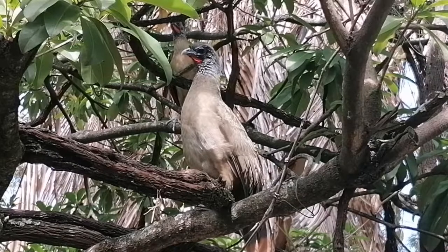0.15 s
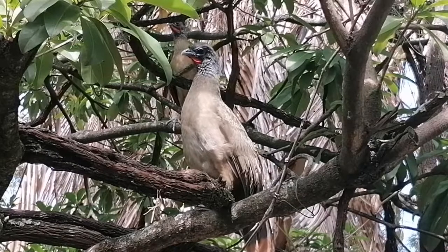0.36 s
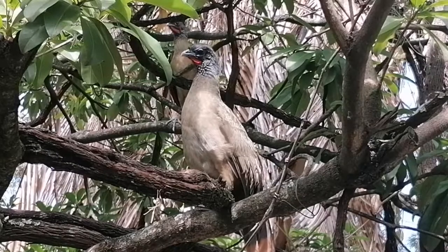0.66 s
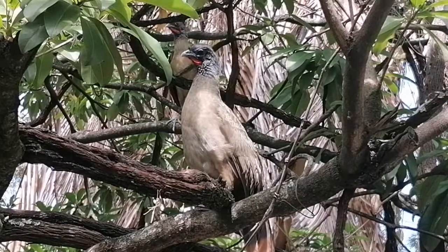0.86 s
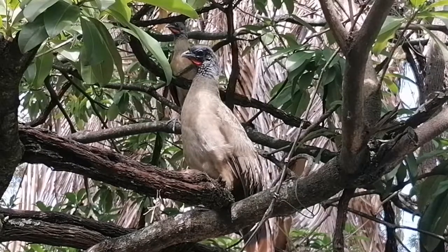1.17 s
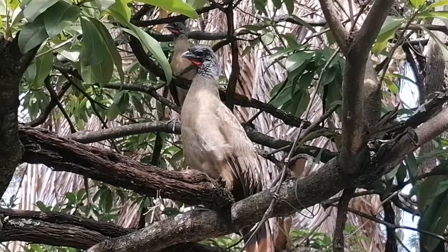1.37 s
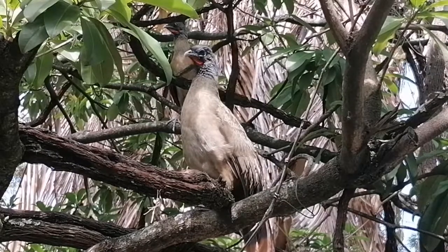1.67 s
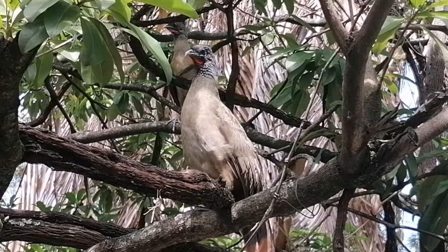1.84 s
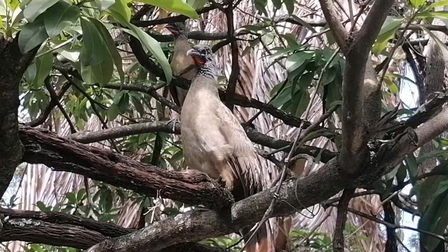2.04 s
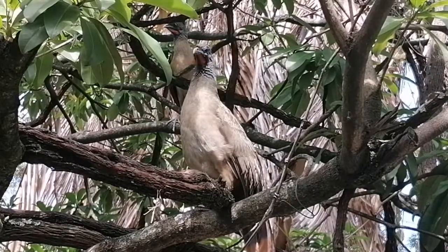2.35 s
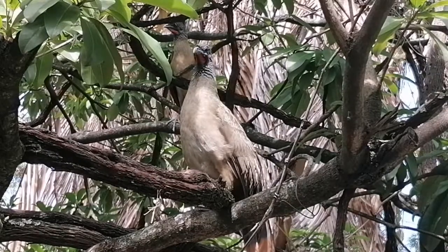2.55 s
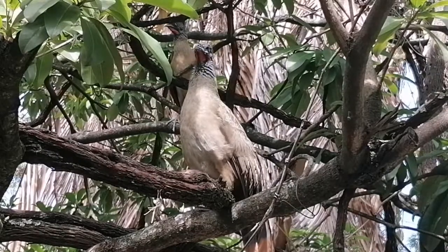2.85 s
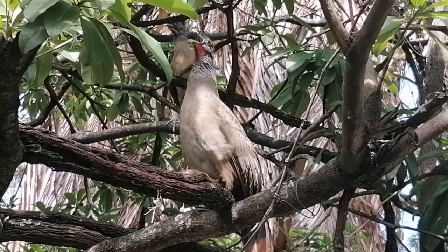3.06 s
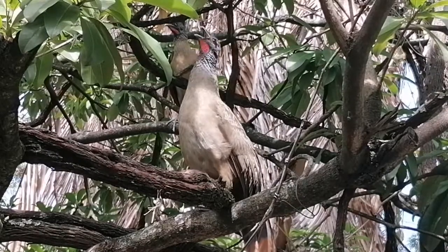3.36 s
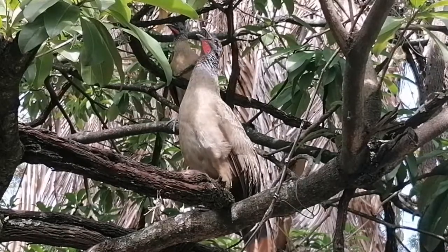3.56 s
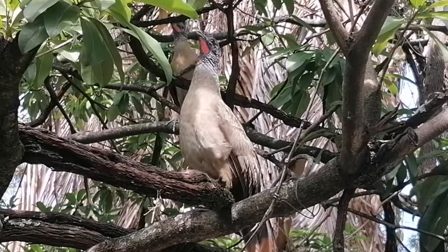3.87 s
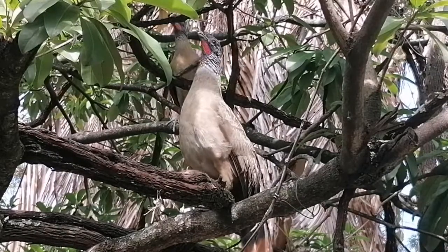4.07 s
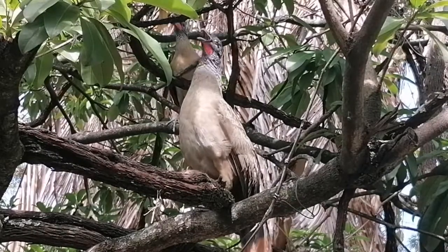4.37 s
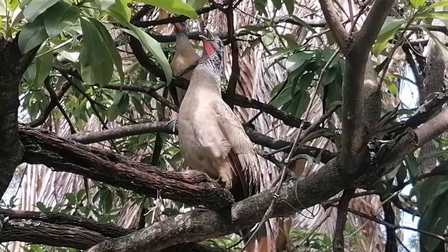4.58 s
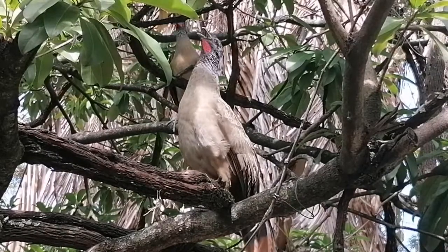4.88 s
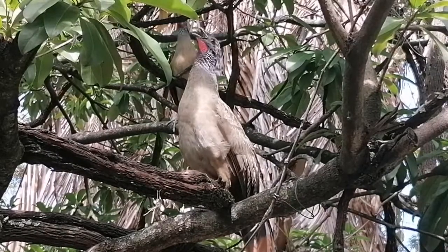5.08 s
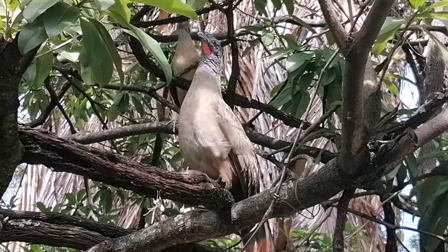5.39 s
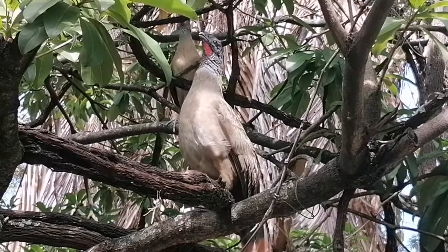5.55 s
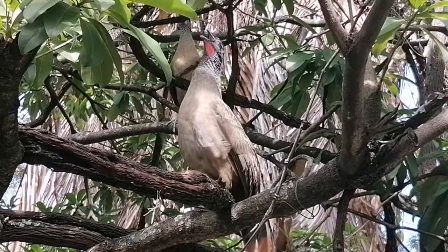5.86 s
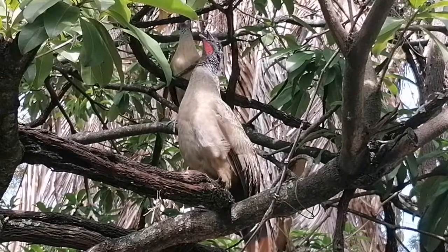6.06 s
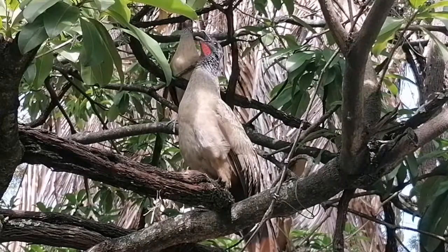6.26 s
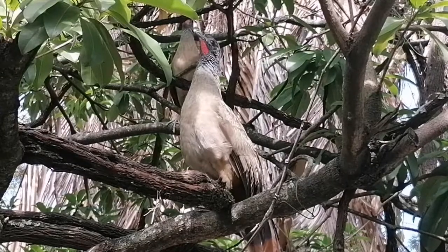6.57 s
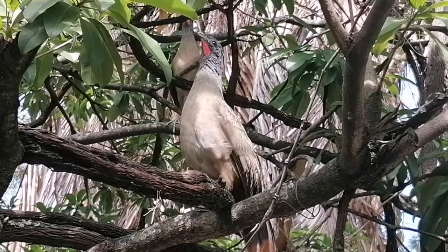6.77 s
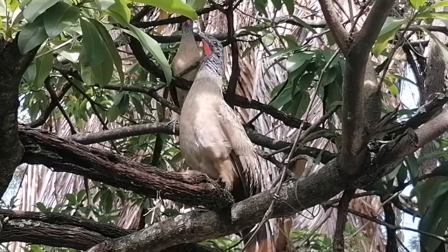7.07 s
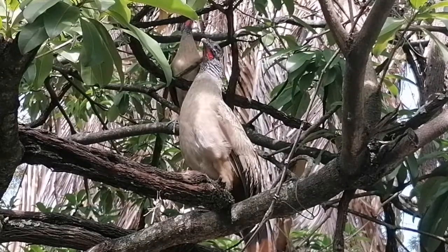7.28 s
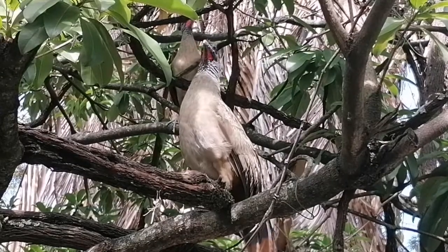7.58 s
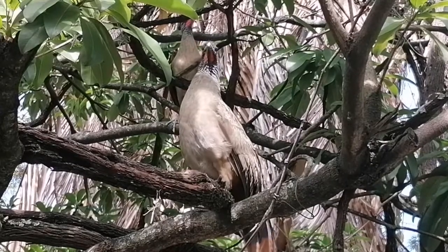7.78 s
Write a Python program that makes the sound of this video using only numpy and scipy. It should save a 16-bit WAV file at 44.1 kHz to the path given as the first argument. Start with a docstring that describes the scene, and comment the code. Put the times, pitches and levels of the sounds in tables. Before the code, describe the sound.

Outdoors in a leafy grove, hoarse chicken-like tree birds call in turns: one at left starts with two throaty honks, then chattering phrases; another ahead replies with repeated harsh cackles, and a high, squealing yelper joins near the end. A thin distant whistle precedes them. Reverberant scatter follows every cry. Soft air hiss, faint small birds and low wind bumps on the handheld microphone lie underneath.

```python
"""Three chachalacas call in overlapping turns from a leafy tree: one to the left, one ahead, a shriller one beside it.
Faint whistles, small birds and a low hum sound far away over a quiet hiss and a little wind on the microphone.
The raucous birds add puffs from two sides of the syrinx, each at its own rate, and ring them in the windpipe.
The shrill bird sums gliding partials with pulsed rasp; far birds are sines or narrow noise bands.
Decaying noise echoes stand for scatter off twigs, trunks and leaves; air and wind are shaped stereo noise."""
import sys
import numpy as np
from scipy import signal
from scipy.fft import rfft, irfft
from scipy.io import wavfile
from scipy.ndimage import uniform_filter1d

SR = 44100
rng = np.random.default_rng(int(sys.argv[2]) if len(sys.argv) > 2 else 0)


def to_wav(sig):
    """Store sig (one row per channel, or 1-D mono) as 16-bit WAV at the path in sys.argv[1].

    Samples outside -1..1 are clipped; the rate is SR.
    """
    pcm = np.clip(np.atleast_2d(sig), -1, 1) * 32767
    pcm = np.round(pcm).astype(np.int16)
    wavfile.write(sys.argv[1], SR, pcm.T)  # frames by channels


N = 349695
TIME_S = np.arange(N) / SR


def amp(db):
    """Turn decibels into a linear gain."""
    return 10 ** (np.asarray(db) / 20)


def rms_one(x):
    """Scale to unit rms."""
    return x / np.sqrt(np.mean(x ** 2) + 1e-20)


def evened(x):
    """Hold the short-term rms near 1, over windows of about 30 ms."""
    return x / np.sqrt(uniform_filter1d(x ** 2, size=1300) + 1e-12)


def band(x, low_hz, high_hz):
    """Keep one range of frequencies with a Butterworth band-pass."""
    edges_hz = [low_hz, min(high_hz, SR * .45)]
    return signal.sosfilt(signal.butter(2, edges_hz, "band", fs=SR, output="sos"), x)


def drift(rate_hz):
    """Random wandering of unit rms: noise through a two-pole low-pass at about the given rate."""
    r = np.exp(-2 * np.pi * rate_hz / SR)
    settle = 9000  # samples dropped while the filter starts up
    wander = signal.lfilter([1], [1, -2 * r, r * r], rng.standard_normal(N + settle))
    return rms_one(wander[settle:])


def stereo_noise(alike):
    """White noise partly shared by both ears: alike runs from 0 (separate) to 1 (the same)."""
    mid, side = rng.standard_normal((2, N))
    return np.sqrt(1 + alike) * mid + np.sqrt(1 - alike) * side * [[1], [-1]]


def in_time(rows):
    """Draw straight lines through a table whose first column is time, one curve per other column."""
    s, *columns = np.transpose(rows)
    return [np.interp(TIME_S, s, column) for column in columns]


def gated_curves(tables):
    """A gate open within each table's time span, its edges smoothed over 4 ms, and the joined curves."""
    is_open = sum((TIME_S > rows[0][0]) & (TIME_S < rows[-1][0]) for rows in tables)
    gate = uniform_filter1d(np.minimum(is_open, 1.), size=180)
    return gate, in_time([row for rows in tables for row in rows])


def sung(table):
    """For each note: its samples, time since its start, share of its length, gain and other columns."""
    release_s, release_db = .022, -21.5
    attack_curve = 0.64  # under 1: a note jumps in, then swells
    for start, attack, length, peak_db, end_db, *rest in table:
        first = int(start * SR)
        count = min(int((length + 2 * release_s) * SR), N - first)
        since = np.arange(count) / SR
        # sag from the peak to the end level, then die away in two steps
        corners_s = [attack, max(length, attack + .001), length + release_s, length + 2 * release_s]
        db = np.interp(since, corners_s, [peak_db, end_db, end_db + release_db, end_db + 3 * release_db])
        rise = np.minimum(since / max(attack, .002), 1) ** attack_curve
        yield slice(first, first + count), since, since / length, amp(db) * rise, rest


def repeated(phrase, starts):
    """Lay out the rows of a phrase at each of its starts, stretched in time."""
    return [(start + stretch * s, *rest) for start, stretch in starts for s, *rest in phrase]


def pipe(x, modes):
    """Windpipe: parallel resonances with alternating signs."""
    out = 0
    for k, (hz, width_hz, db) in enumerate(modes):
        r = np.exp(-np.pi * width_hz / SR)
        feed = [(1 - r * r) / 2, 0, (r * r - 1) / 2]
        ring = [1, -2 * r * np.cos(2 * np.pi * hz / SR), r * r]
        out = out + (-1) ** k * amp(db) * signal.lfilter(feed, ring, x)
    return out


def placed(low, treble, place):
    """Seat a bird in stereo: pan low and treble apart and let sound reach the left ear first."""
    low_db, treble_db, lead_s = place
    side = np.array([[.5], [-.5]])
    left, right = low * amp(low_db * side) + treble * amp(treble_db * side)
    late = np.exp(-2j * np.pi * np.fft.rfftfreq(N, 1 / SR) * lead_s)
    return np.array([left, irfft(rfft(right) * late, N)])


def air():
    """Far hiss of leaves and town: broadband noise with a fixed colour and a slightly drifting level."""
    # spectrum of the hiss: (frequency [Hz], relative level [dB])
    colour = [(88, -37), (150, -27), (258, -5), (326, -10), (561, -11), (860, -13.5), (2760, -18.5),
              (3550, -24), (5870, -24.5), (15500, -42.5)]
    level_db, alike = -69, .5
    hz = np.maximum(np.fft.rfftfreq(N, 1 / SR), 1)
    colour_hz, colour_db = np.transpose(colour)
    shape = amp(np.interp(np.log(hz), np.log(colour_hz), colour_db))
    hiss = rms_one(irfft(rfft(stereo_noise(alike)) * shape, N))
    return amp(level_db + 1.2 * drift(5.6)) * hiss


def wind():
    """Wind on the microphone: lumpy low noise in two bands, bell-shaped gusts over a murmur."""
    # murmur between the gusts: (time [s], thud level [dB], hum level [dB])
    murmur = [(0.0, -65, -69.5), (.7, -71, -75.5), (2.1, -74, -75), (3.2, -86, -75.5), (4.5, -84, -101),
              (5.45, -83, -79), (5.75, -75.5, -66), (6.3, -74, -88.5), (6.8, -76.5, -77), (7.5, -72, -64),
              (7.93, -75, -74.5)]
    # gusts: (centre [s], half width [s], thud level [dB])
    gust_rows = [(1.25, 0.19, -55), (2.66, 0.066, -66), (2.96, .1, -62.5), (3.57, 0.065, -52),
                 (3.84, 0.085, -51), (4.15, .07, -61), (5.63, .1, -72.5), (7.93, 0.22, -67)]
    gust_hum_db = -12.5  # higher part of each gust, against its thud
    thud_db, hum_db = in_time(murmur)
    gusts = sum(amp(db) * np.exp(-((TIME_S - s) / width) ** 2) for s, width, db in gust_rows)
    noise = stereo_noise(alike=.65)
    thud_level = (amp(thud_db) + gusts) * amp(1.7 * drift(8))
    thud = thud_level * rms_one(band(noise, 24, 70))
    hum_level = (amp(hum_db) + amp(gust_hum_db) * gusts) * amp(2.5 * drift(8))
    return thud + hum_level * rms_one(band(noise, 65, 140))


def rising_whistle():
    """A far, almost pure whistle climbing steadily: a sine and its faint octave."""
    # loudness: (time [s], level [dB])
    loudness = [(0.0, -57.5), (.1, -69.5), (.15, -72), (.21, -56), (.29, -54.5), (.335, -61.5),
                (.53, -50.5), (.57, -57.5), (.66, -55), (.7, -75), (.73, -66), (.77, -91.5)]
    start_hz, climb_hz_per_s, octave_db = 688, 187, -20.5
    gate, (db,) = gated_curves([loudness])
    phase = 2 * np.pi * np.cumsum(start_hz + climb_hz_per_s * TIME_S) / SR
    return gate * amp(db) * (np.sin(phase) + amp(octave_db) * np.sin(2 * phase))


def far_sounds():
    """Far whistle, hoot, thin notes, chirps and hum: sines, most of them blurred by random gain."""
    # all four: (start [s], attack [s], length [s], peak [dB], end level [dB], from [Hz], to [Hz])
    # one soft near-sine note before the first cry
    hoot = (.936, .02, .085, -51, -48, 603, 610)
    # thin breathy notes
    thin_notes = [(0, .12, .68, -74, -77, 3530, 3590), (.12, .16, .29, -59, -74, 1400, 1190),
                  (7.08, .025, .13, -71, -77, 3800, 3800), (7.7, .14, .23, -71, -72, 3720, 3500)]
    # breathy chirps of small birds
    chirps = [(0, 0.0065, 0.083, -69.5, -77, 3880, 3600), (.15, .135, 0.26, -68, -85, 3590, 3380),
              (.92, 0.018, .09, -89, -78, 7400, 7140), (1.35, 0.0091, .14, -79, -83, 7070, 7050),
              (5.66, 0.02, .1, -72.5, -70.5, 7618, 7553), (6.88, 0.011, 0.058, -75, -77, 5950, 5820),
              (6.96, 0.028, .13, -70, -77, 5910, 5900), (7.72, 0.077, .1, -63.5, -64, 5560, 5730),
              (7.825, .008, .1, -52, -67, 5500, 5520)]
    # one low hum
    far_hum = (6.83, .04, .72, -64, -65, 101, 104)
    # a faster random gain spreads a sine into a wider band of noise
    layers = [([hoot], np.ones(N)), (thin_notes, drift(50)), (chirps, drift(450)),
              ([far_hum], 1 + 0.49 * drift(4.8))]
    out = rising_whistle()
    for table, blur in layers:
        for span, _, share, gain, (from_hz, to_hz) in sung(table):
            phase = 2 * np.pi * np.cumsum(from_hz + (to_hz - from_hz) * share) / SR
            out[span] += gain * blur[span] * np.sin(phase)
    return out * np.sqrt(2)  # levels count as rms


def grove(x):
    """Scatter from twigs, near trunks and the far edge: noise dying band by band, separate for each ear."""
    # octave bands: (centre [Hz], trunks t60 [s], trunks level [dB], far edge t60 [s], far edge level [dB])
    octaves = [(286, 0.67, -12, .6, -13.5), (595, 0.68, -7.5, 0.6, -32.5), (977, 0.46, -5.5, 1.47, -21.5),
               (2240, 0.41, -3, 1.6, -23.5), (5100, 0.36, -2, 1.2, -19), (9000, 0.42, -4, 0.41, -46)]
    twigs_db, twigs_t60_s = -4, .04
    t = np.arange(int(1.3 * SR)) / SR

    def dying(db, t60_s):
        """Exponential decay by 60 dB in t60, scaled so that long decays start lower."""
        return amp(db - 60 * t / t60_s) / np.sqrt(t60_s * SR / 14)

    white = rng.standard_normal((2, len(t)))
    response = band(rng.standard_normal((2, len(t))), 1100, 17000) * dying(twigs_db, twigs_t60_s)
    build_up = np.minimum(t / 0.012, 1)
    for hz, near_t60, near_db, far_t60, far_db in octaves:
        noise = rms_one(band(white, hz / np.sqrt(2), hz * np.sqrt(2)))
        noise = noise * np.sqrt(hz * np.sqrt(2) / SR)  # wider octaves carry more energy
        response = response + noise * (dying(near_db, near_t60) + dying(far_db, far_t60)) * build_up
    return signal.fftconvolve(x, response, axes=1)[:, :N]


def shrill_bird():
    """A high voice of twelve partials, the second strong; the more it rasps, the more its pitch wavers."""
    # short notes: (start [s], attack [s], length [s], peak [dB], end level [dB],
    # second partial from [Hz], to [Hz], rasp against the tone [dB])
    short_notes = [ (4.93, .035, .06, -31.5, -35.5, 1278, 1370, -4.5),
                   (5.04, 0.02, 0.046, -32.5, -31, 1307, 1370, 0),
                   (5.172, 0.015, 0.082, -20, -26, 1264, 1328, -8.5),
                   (6.15, 0.05, .07, -19.5, -23, 1215, 1338, -8.5),
                   (6.262, .012, 0.06, -23, -32, 1213, 1214, -12.5),
                   (6.35, 0.024, .125, -25, -23.5, 1207, 1371, -8.5)]
    # long yelps: (start [s], length [s], held second partial [Hz], reference level [dB])
    yelps = [(5.352, .225, 1207, -19.5), (6.587, .135, 1302, -16.5)]
    # a yelp glides up out of a rasp, holds and breaks: (share of its length [0-1],
    # ratio to held pitch [-], level against reference [dB], rasp against the tone [dB])
    yelp_shape = [(0, .68, -15, 3), (.06, .77, -10, 2), (0.141, .975, -3, 1), (.24, .996, -5, -4),
                  (0.452, 1.001, 1, -16.5), (.63, 1.002, -6, -7), (.72, 1.005, -17, 2), (1, .995, -32, 3)]
    # throat gain read at each partial: (frequency [Hz], gain [dB])
    throat = [(600, -31), (1150, 0.5), (1350, 0.5), (1800, -10.5), (1960, -17.5), (2420, -12.5),
              (2630, -10.5), (3020, -8), (3290, -15.5), (4500, -25), (6000, -18.5), (8000, -28)]
    # windpipe resonances that colour the rasp: (centre [Hz], width [Hz], gain [dB])
    rasp_pipe = [(870, 440, -8.5), (1560, 410, -3), (2150, 410, -14), (3120, 330, -3.5), (5900, 880, -12),
                 (9550, 870, -22)]
    # seat: (left over right, tone [dB], left over right, rasp [dB], left ear lead [s])
    seat = (-.5, -.5, .00008)
    yelp_tables = [[(s + length * share, hz * ratio, reference_db + shape_db, rasp)
                    for share, ratio, shape_db, rasp in yelp_shape]
                   for s, length, hz, reference_db in yelps]
    gate, (second_hz, db, rasp_db) = gated_curves(yelp_tables)
    level = gate * amp(db)
    for span, _, share, gain, (from_hz, to_hz, note_rasp_db) in sung(short_notes):
        level[span] = gain
        second_hz[span] = from_hz + (to_hz - from_hz) * share
        rasp_db[span] = note_rasp_db
    waver = 0.061 * amp(rasp_db) * drift(90)
    phase = np.pi * np.cumsum(second_hz * (1 + waver)) / SR  # fundamental: half the second partial
    throat_hz, throat_db = np.transpose(throat)
    tone = 0
    for k in range(1, 13):
        gain = amp(np.interp(k * second_hz / 2, throat_hz, throat_db))
        tone = tone + gain * np.sin(k * phase + k * k)
    tone = tone * np.sqrt(2)
    puffed = (1 + np.cos(phase)) ** 2 * rng.standard_normal(N)
    rasp = amp(rasp_db) * evened(band(pipe(puffed, rasp_pipe), 550, 15000))
    level = level * amp(1.5 * drift(80))
    return placed(level * tone, level * rasp, seat)


def membrane(hz, rough):
    """One side of the syrinx: a train of sharp air puffs, uneven in time and size when rough."""
    jitter, shimmer_db, sharp = .1, 7.0, .85
    phase = 2 * np.pi * np.cumsum(hz * (1 + jitter * rough * drift(149.45))) / SR
    puffs = (1 - sharp ** 2) / (1 - 2 * sharp * np.cos(phase) + sharp ** 2)
    return puffs * amp(shimmer_db * rough * np.clip(drift(450), -2, 2))


def raucous(cries, voice, modes, seat, lower_share, hiss, floor_hz):
    """Two membranes share one airflow, so each also throttles the other; air hisses at each puff."""
    beak_opens_s, middle_follows = 0.29, 0.39  # the middle band takes a share of the top band's rise
    brighter_db_per_octave, open_hz = 7.5, 559.5  # higher pitch of the upper side also brightens
    level, middle_db, top_db = np.zeros((3, N))
    for span, since, _, gain, (middle_start_db, top_start_db) in sung(cries):
        level[span] = gain
        # the top band closes its gap to the low band as the beak opens
        top_db[span] = top_start_db * np.exp(-since / beak_opens_s)
        middle_db[span] = middle_start_db + middle_follows * (top_db[span] - top_start_db)
    upper_hz, lower_hz, rough = in_time(voice)
    lift_db = brighter_db_per_octave * np.log2(upper_hz / open_hz)
    middle_db = middle_db + middle_follows * lift_db
    top_db = top_db + lift_db
    sizzle_db = 1.61 * top_db - 7.5  # the highest band grows fastest as the beak opens

    upper, lower = membrane(upper_hz, rough), membrane(lower_hz, rough)
    flow = upper + lower_share * lower + 0.026 * upper * lower
    turbulence = flow * rng.standard_normal(N)
    breath = (rough + 0.47) * turbulence
    bright = flow + 3.8 * hiss * breath

    low = pipe(flow + .5 * rough * turbulence, modes[:3])
    low = band(band(low, floor_hz, 1300), floor_hz, 3300)
    middle = band(pipe(flow + hiss * breath, modes[3:6]), 1250, 3500)
    top = band(pipe(bright, modes[6:9]), 2700, 7000)
    sizzle = band(pipe(bright, modes[9:]), 6000, 15500)
    treble = amp(middle_db) * evened(middle) + amp(top_db) * evened(top) + amp(sizzle_db) * evened(sizzle)
    return placed(level * evened(low), level * treble, seat)


def ahead_bird():
    """The raucous bird ahead: one phrase three times, its two membranes close in pitch."""
    # cries: (start [s], attack [s], length [s], peak [dB], end level [dB],
    # starting middle band against the low [dB], starting top band against the low [dB])
    cries = [ (3.16, 0.049, 0.1, -31, -38.5, 1, -5), (3.299, 0.014, 0.068, -24.5, -34.5, -0.5, -8.5),
             (3.403, .01, .034, -28, -27.5, 4.5, -3), (3.46, 0.011, 0.063, -25, -28, 0.5, -5.5),
             (3.64, 0.036, .16, -28, -34.5, -4, -8.5), (4.457, 0.082, 0.13, -29.5, -36.5, 0, -4.5),
             (4.625, 0.014, 0.079, -29, -35, 0, -6.5), (4.738, 0.0062, 0.044, -28.5, -32, 3.5, -3),
             (4.796, 0.0087, 0.08, -27.5, -33.5, 4, -2), (4.945, .07, 0.24, -24.5, -26.5, -1, -8),
             (5.775, 0.064, 0.12, -18.5, -24, -1.5, -7), (5.946, 0.017, 0.056, -21, -27, 1.5, -4),
             (6.05, 0.015, 0.039, -23, -32, 3.5, -2.5), (6.107, 0.0054, 0.081, -26.5, -34, 4.5, -2),
             (6.28, .06, .27, -22, -33, -0.5, -6.5)]
    # membranes: (time into the phrase [s], upper side [Hz], lower side [Hz], roughness [0-1])
    phrase = [(0, 315, 300, .45), (.035, 335, 320, .42), (.062, 566, 481, .33), (.132, 618, 550, .24),
              (.16, 610, 525, .35), (.245, 498, 448, .34), (.27, 604, 538, .3), (.33, 597, 550, .3),
              (.425, 645, 570, .3), (.49, 522, 461, .32), (.56, 589, 516, .17), (.65, 558, 489, .2),
              (.702, 469, 452, .3), (.725, 325, 310, .42), (.762, 305, 295, .45)]
    # phrases: (start [s], stretch in time [-])
    starts = [(3.149, .96), (4.469, .995), (5.769, 1.04)]
    # windpipe, three resonances each for low, middle and top, the rest for sizzle:
    # (centre [Hz], width [Hz], gain [dB])
    modes = [(300, 93, -12), (641, 1000, -10), (988, 180, 6.5), (1600, 570, -7), (2040, 190, 9.5),
             (2650, 700, 4), (3364, 550, 0.5), (4805, 120, 0.5), (5360, 980, -5), (7200, 440, 11.5),
             (9500, 2400, 0), (12500, 4600, -30.5)]
    # seat: (left over right, low band [dB], left over right, treble [dB], left ear lead [s])
    seat = (-1.8, 0, .00001)
    return raucous(cries, repeated(phrase, starts), modes, seat, lower_share=.7, hiss=1.3, floor_hz=250)


def left_bird():
    """The raucous bird on the left: it warms up about an octave apart, then sings one phrase twice."""
    # cries: (start [s], attack [s], length [s], peak [dB], end level [dB],
    # starting middle band against the low [dB], starting top band against the low [dB])
    cries = [ (1.021, 0.034, 0.13, -21.5, -24, -4, -27), (1.539, 0.038, 0.17, -19, -18.5, -2.5, -23.5),
             (1.789, 0.012, 0.017, -15.5, -29.5, 2.5, -6.5), (1.842, .008, .035, -21, -26.5, 3.5, -5),
             (1.885, 0.011, 0.042, -21.5, -29.5, 2.5, -9), (2.27, 0.045, 0.12, -21.5, -23, 1.5, -7.5),
             (2.475, 0.007, .055, -22, -35.5, 3.5, -3.5), (2.588, 0.0083, 0.018, -17, -26, 3, -5.5),
             (2.637, 0.0069, 0.024, -25.5, -34.5, 7.5, 0.5), (2.678, 0.0094, 0.059, -21.5, -37.5, 2, -6),
             (2.88, 0.0062, 0.26, -25, -32.5, 4.5, -2.5), (3.5, 0.018, 0.1, -27, -28.5, 4.5, 0),
             (3.785, 0.016, .024, -25.5, -33, 6.5, 1), (3.839, 0.0078, 0.031, -28.5, -42, 8.5, 2.5),
             (3.884, .012, 0.055, -26.5, -37, 4.5, -3), (4.088, 0.0057, 0.21, -27.5, -38, 4.5, -3.5)]
    # membranes while warming up: (time [s], upper side [Hz], lower side [Hz], roughness [0-1])
    warmup = [(1.021, 360.7, 190, 0.66), (1.172, 419.7, 215, 0.64), (1.538, 340, 170, 0.5),
              (1.625, 520.7, 259.9, 0.45), (1.643, 575.2, 289.5, 0.14), (1.715, 621.8, 311.3, 0.02),
              (1.731, 614.2, 310.5, 0.49), (1.787, 560, 280.1, 0.52), (1.949, 560, 277.8, 0.82)]
    # membranes afterwards: (time into the phrase [s], upper side [Hz], lower side [Hz], roughness [0-1])
    phrase = [(0, 340, 242.5, .45), (.055, 480, 431.3, 0.32), (.13, 545.7, 483, .33),
              (.2, 498.7, 403.7, .6), (.46, 510.2, 409.8, .5), (.595, 401, 400.6, .46),
              (.635, 530, 445, .45), (.77, 478, 424.9, .45), (.835, 300, 275, 0.41)]
    # phrases: (start [s], stretch in time [-])
    starts = [(2.27, 1.03), (3.5, .99)]
    # windpipe, three resonances each for low, middle and top, the rest for sizzle:
    # (centre [Hz], width [Hz], gain [dB])
    modes = [(240, 220, -16.5), (653, 342, -7), (1000, 114, 7.5), (1563, 130, -0.5), (2150, 293, 4.5),
             (2660, 410, 0), (3480, 560, 2), (4507, 200, 3), (5080, 590, -5), (7300, 1220, 3.5),
             (9300, 3400, -6), (12400, 3900, -16.5)]
    # seat: (left over right, low band [dB], left over right, treble [dB], left ear lead [s])
    seat = (2.2, 3.0, .00021)
    voice = warmup + repeated(phrase, starts)
    return raucous(cries, voice, modes, seat, lower_share=0.73, hiss=1.68, floor_hz=149)


def scene():
    """The birds and their echoes in the grove, over air and wind."""
    # send into the grove as the left bird turns its head toward it: (time [s], level [dB])
    left_send = [(1.1, -10), (1.7, -2.5), (1.9, -5), (2.5, -1.5), (4.3, -1.5)]
    ahead_send_db, shrill_send_db, far_send_db = 4, 5.5, 4
    left, ahead, high, far = left_bird(), ahead_bird(), shrill_bird(), far_sounds()
    sent = amp(in_time(left_send)[0]) * left + amp(ahead_send_db) * ahead
    sent = sent + amp(shrill_send_db) * high + amp(far_send_db) * far
    return left + ahead + high + far + grove(sent) + air() + wind()


def record(dry):
    """Round the peaks softly and cut the treble steeply."""
    peak_top, cutoff_hz = .75, 16300
    rounded = peak_top * np.tanh(dry / peak_top)
    # 70 dB down from the cutoff upward
    return signal.sosfilt(signal.cheby2(12, 70, cutoff_hz, fs=SR, output="sos"), rounded)


dry = scene()
out = record(dry)
to_wav(out)
```